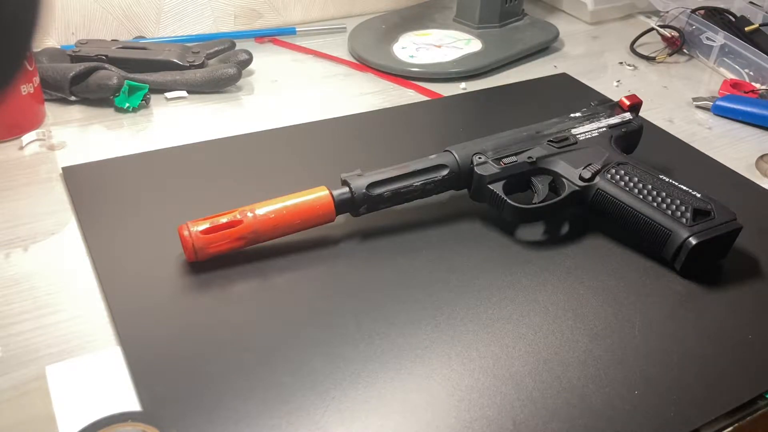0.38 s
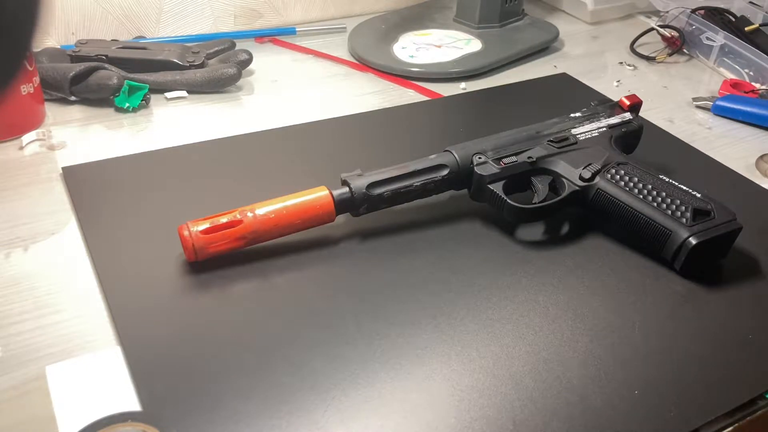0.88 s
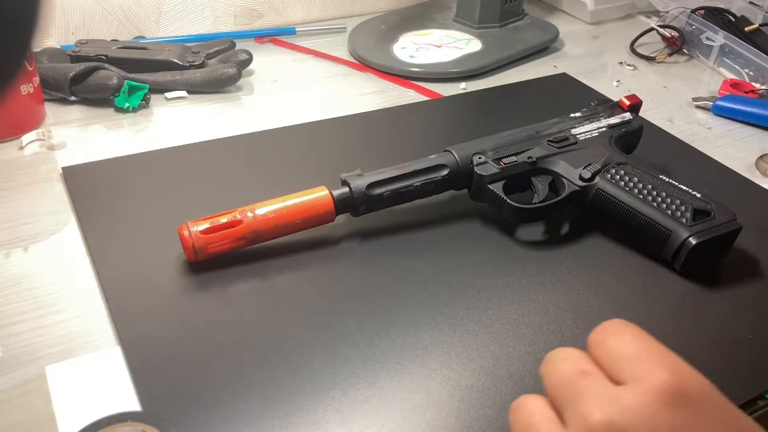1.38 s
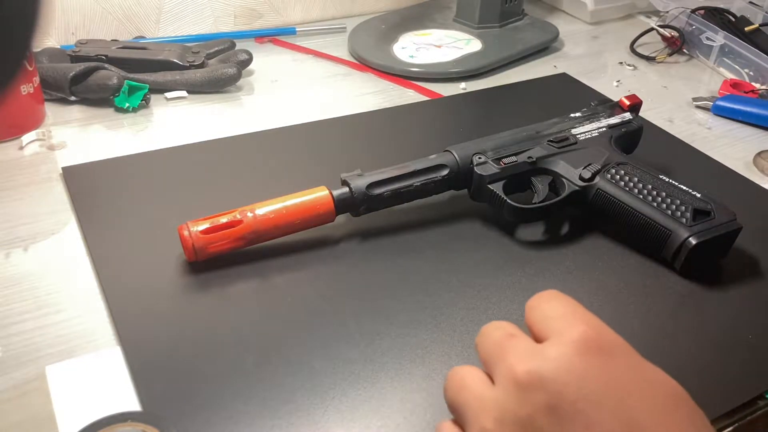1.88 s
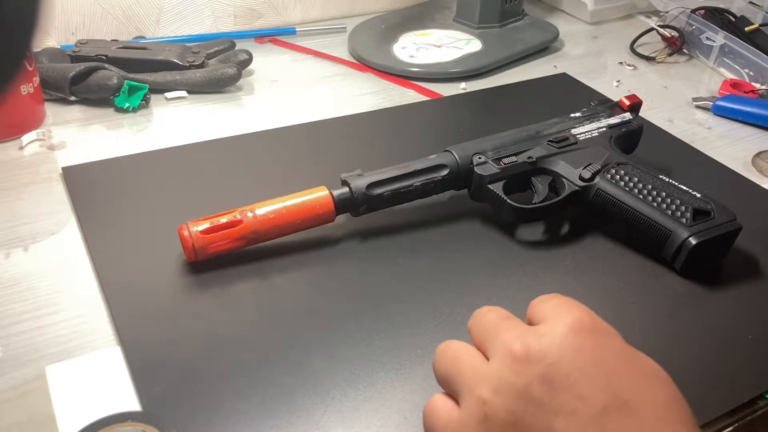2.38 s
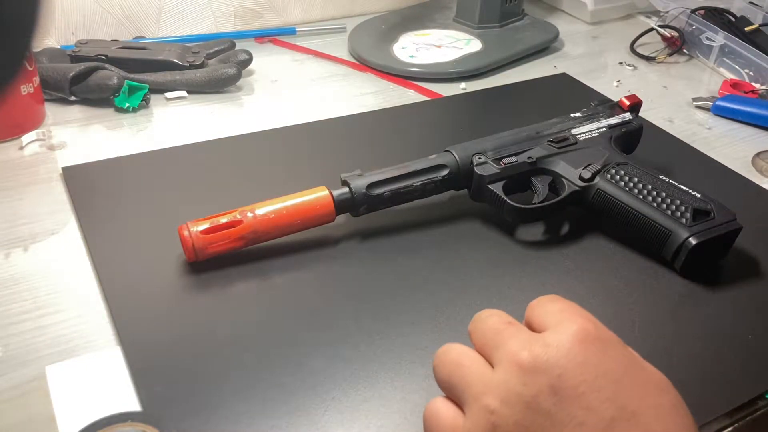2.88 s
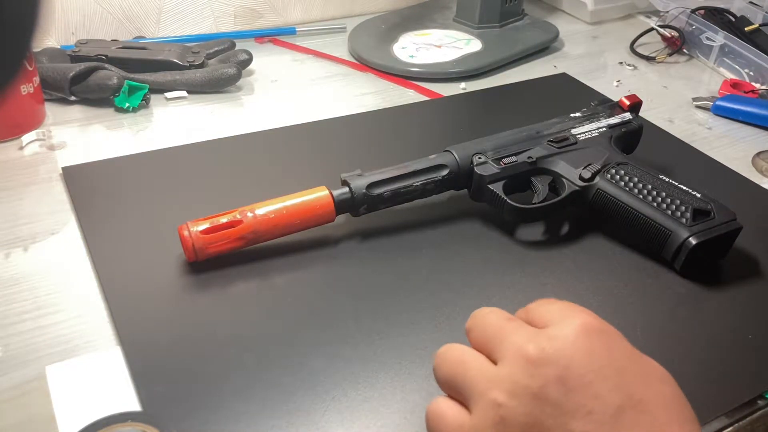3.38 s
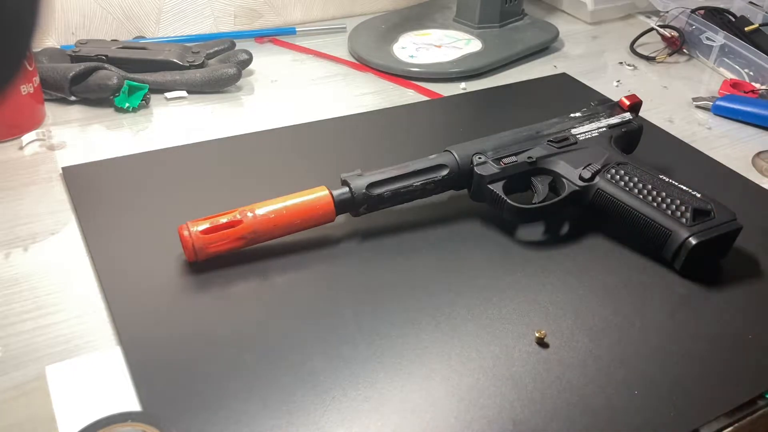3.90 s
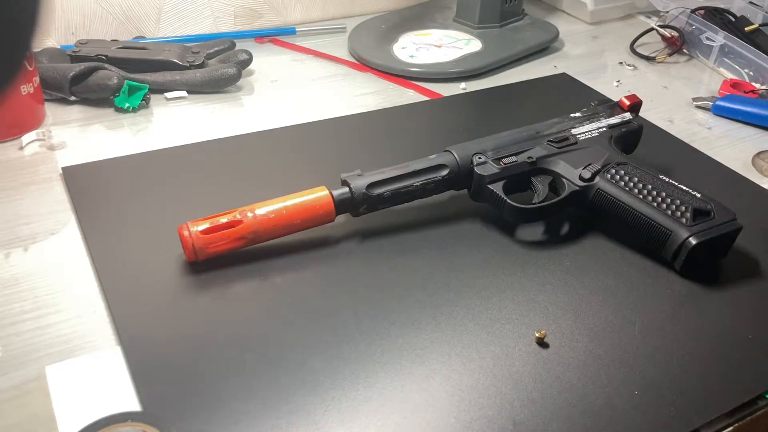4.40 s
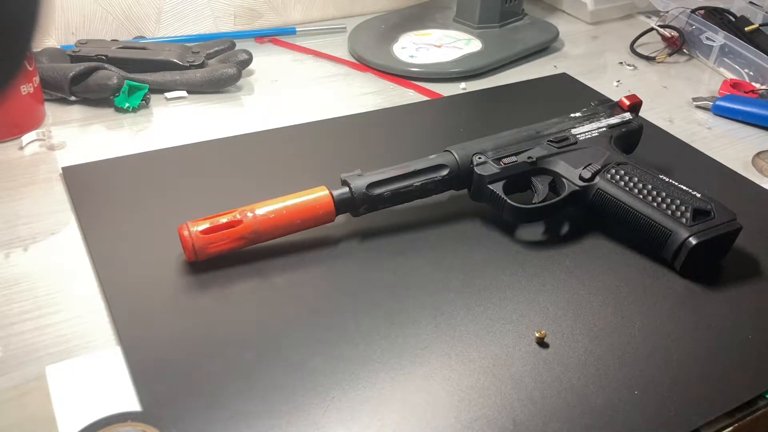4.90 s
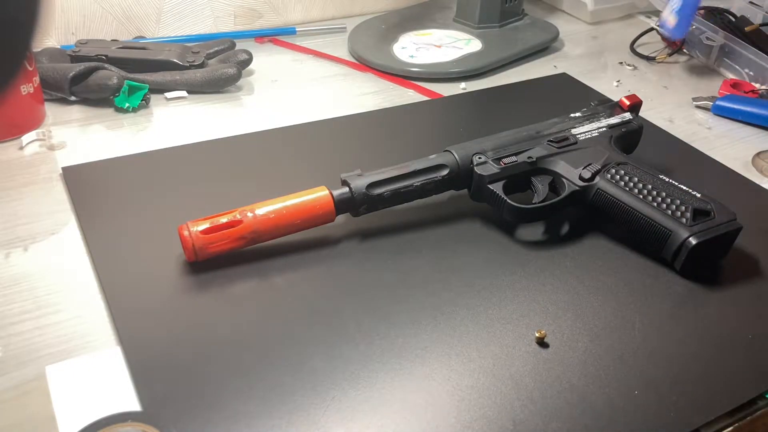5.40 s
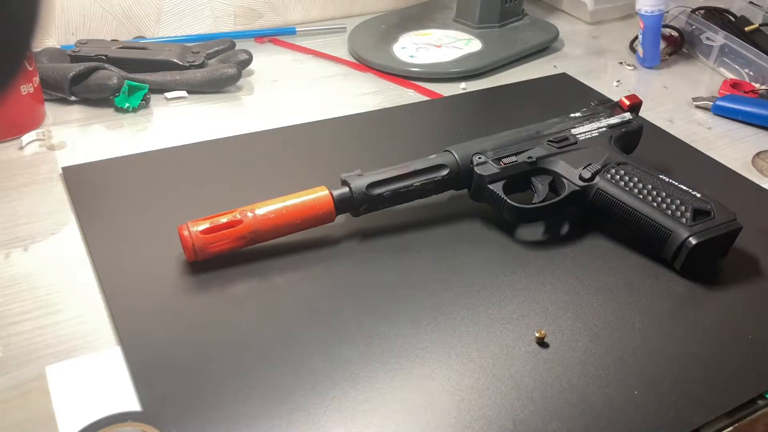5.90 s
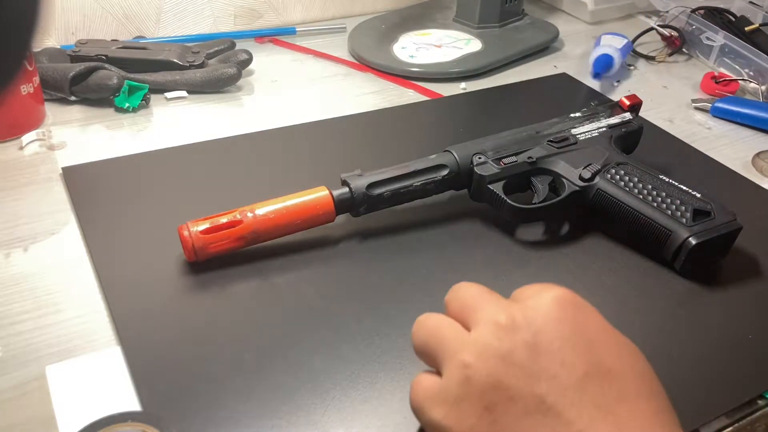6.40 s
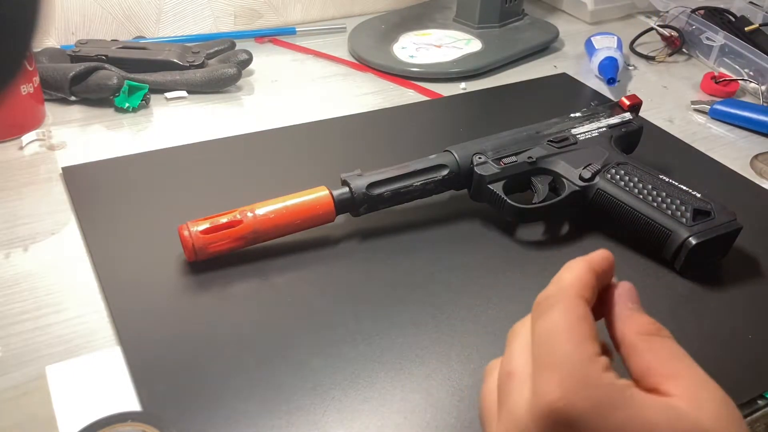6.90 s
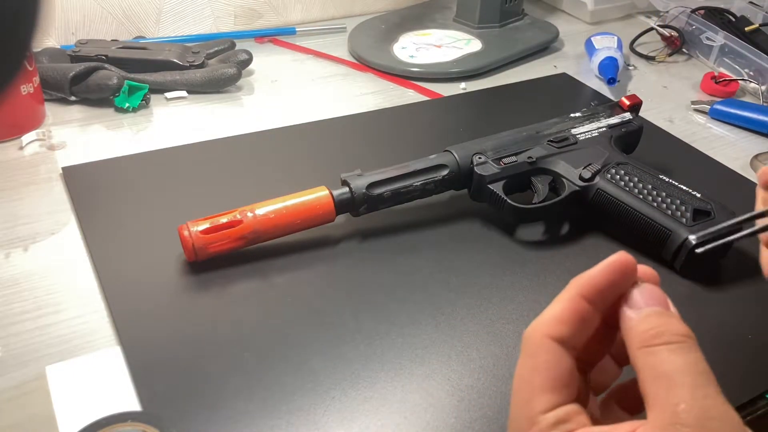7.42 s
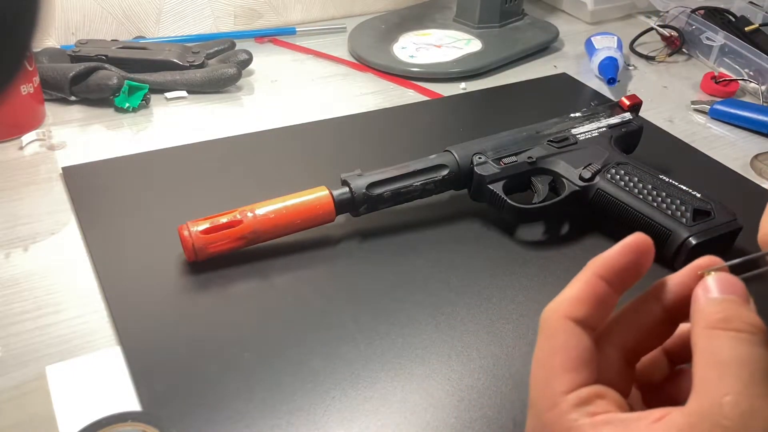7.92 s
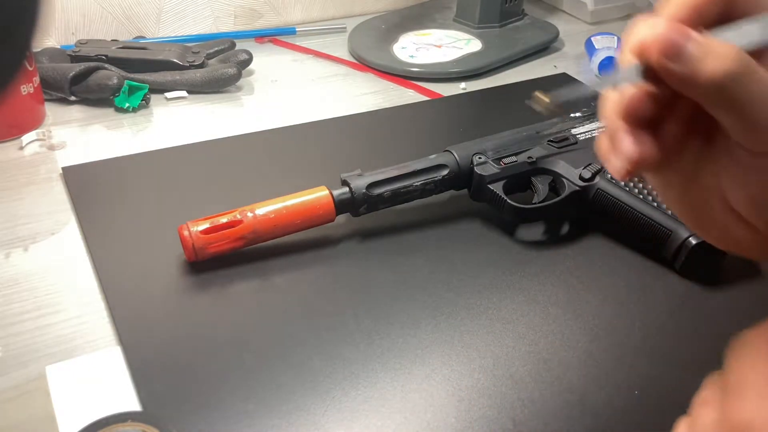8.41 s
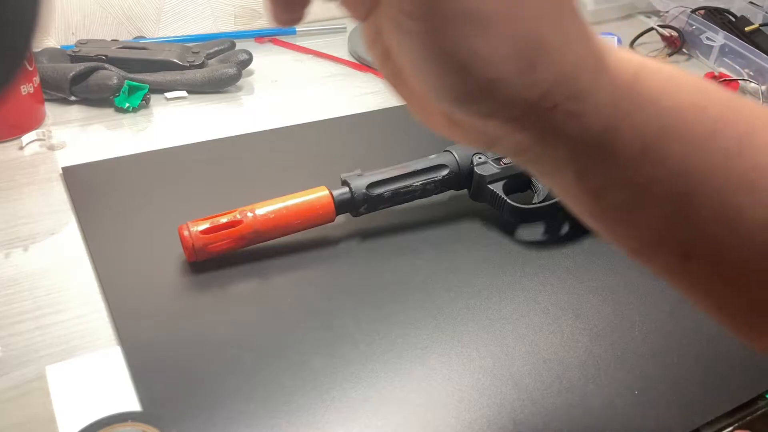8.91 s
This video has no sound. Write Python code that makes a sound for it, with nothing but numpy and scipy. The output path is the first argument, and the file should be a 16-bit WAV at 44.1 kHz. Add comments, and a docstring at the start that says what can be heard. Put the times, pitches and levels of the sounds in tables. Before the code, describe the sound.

A small hard part bounces to rest on a matted desk, followed by hand slaps, a sharp click and a plastic tube knocking over.

```python
"""Close to a phone in a quiet small room, distant traffic rumbles under microphone hiss: shaped noise.
Scuffs and taps of small metal parts on a matted desk come first, then a squeak (rough gliding tone) and,
at 1.5 s, a hard part bouncing to rest. From 2.9 s the hand lands on the mat in hollow slaps and dull thuds.
At 5.5 s a glue tube is set down hard; at 6.3 s it falls over and rocks; sparser handling follows.
Contacts are noise bursts ringing part and desk, plus room reflections; heavy blows swing the desk top."""
import sys
import numpy as np
from scipy import signal
from scipy.fft import rfft, irfft, next_fast_len
from scipy.io import wavfile
from scipy.ndimage import uniform_filter1d

SR = 44100
rng = np.random.default_rng(int(sys.argv[2]) if len(sys.argv) > 2 else 0)


def store_pcm(level_fs):
    """Save levels as 16-bit WAV."""
    pcm = np.round(np.clip(level_fs, -1, 1) * 32767).astype(np.int16)
    wavfile.write(sys.argv[1], SR, np.atleast_2d(pcm).T)


def invert_db(level):
    """Linear amplitude ratio for a level in decibels (20 dB per decade), elementwise."""
    return 10 ** (np.asarray(level, dtype=float) / 20)


N = 398663
SPAN = 16384  # samples per contact
HZ = np.fft.rfftfreq(SPAN, 1 / SR)
T_S = np.arange(SPAN) / SR

# background: (frequency [Hz], density [dB/Hz], left-right likeness [0-1])
QUIET = [(23.83, -94.5, 1), (54.06, -77, 1), (81.3, -88, 0.6), (130, -93, 1), (298, -100, 0.4),
         (546, -107, 0.1), (1030, -104, .05), (1810, -113, 0.4), (2300, -122, 1), (4770, -125, 0),
         (10590, -126, 0), (14700, -130, 0.6), (15000, -142, 0.55)]
# traffic swell, taken relative to its mean: (time [s], level [dB])
RUMBLE = [(0, -73), (1.3, -76), (2.099, -73.5), (3.002, -74.5), (4.099, -75), (4.699, -81.5), (4.801, -74),
          (5.899, -68.5), (6.801, -72), (7.102, -74), (7.7, -69.5), (7.78, -76.5), (9.04, -72.5)]
# bands of a contact, in the order click, thud, knock, snap, tick: (low edge [Hz], high edge [Hz])
BANDS_HZ = [(1800, 3200), (150, 600), (600, 1800), (3200, 6000), (6000, 16000)]
# room reflections in each of those bands: (t60 [s], level [dB], left-right likeness [0-1])
ROOM = [(0.19, -4.5, 0), (0.2, -0.5, 0.6), (0.2, -0.5, 0.3), (0.2, -2, 1), (0.21, -7.5, 0)]
# hands, right of the phone: (time [s], left minus right [dB], delay of the left port [samples])
HANDS = [(0, -7.5, 9.9), (1.5, -4.5, 12.3), (2.9, -4.5, 17.2), (4.5, -5.5, 19.6), (5.6, -1, 11),
         (6.3, -3.5, 16.1), (9.04, -1.5, 11)]
# resonances over the plain contact: (frequency [Hz], width [Hz], level [dB])
DESK_MODES = [(222, 37, -1), (286, 40, -2), (402, 34, 9), (475, 110, 3.5), (796, 80, 0.5), (904, 290, 9.5),
              (993, 190, 9.5), (1181, 100, 13), (1420, 68, 2.5), (1699, 62, 0)]
PART_MODES = [(2240, 400, 5.5), (3100, 130, 2), (4240, 300, 0.5), (8170, 2200, 5.5), (10917, 1500, 2.5)]
HOLLOW_MODES = [(525, 65, 15)]  # air under the cupped hand and the mat
BEAD_MODES = [(2570, 110, 11.5), (3700, 300, -13.5), (6300, 600, -15.5), (10900, 820, 11.5),
              (12270, 300, 16.5)]  # the bouncing part
TUBE_MODES = [(834, 40, 5), (1141, 35, 13.5), (1770, 60, 8.5), (2280, 300, 11), (3962, 200, 4),
              (8077, 970, 3)]
AROUND_DB = -7  # part resonances stand out less in the reflections
# contacts: (time [s], thud peak [dB], click peak [dB], tick peak [dB], chatter [ms], held to 0.3-40)
SCUFFS = [(0.002, -50, -64, -62.5, 13), (0.05, -54, -68, -74, 11.5), (0.321, -50.5, -67, -64.5, 21),
          (2.672, -51.5, -66, -69, 15.6), (2.789, -46.5, -57, -54, 17.6), (3.031, -46.5, -54.5, -53.5, 14),
          (3.356, -46.5, -60, -41, 3.3), (3.966, -46, -46, -52, 13.3), (3.988, -71, -55, -55, 50),
          (4.18, -72, -87, -57.5, 8.2), (4.81, -74, -83, -62, 34), (4.92, -85.5, -84, -60, 42),
          (5.09, -87, -76, -62, 15), (5.243, -56.5, -68.5, -76, 15.4), (5.68, -47, -55, -53.5, 16),
          (5.819, -49, -68, -70, 10), (5.91, -49.5, -76.5, -74, 5.5), (5.99, -45, -44.5, -48.5, 14.7),
          (6.03, -54, -50.5, -73, 15), (6.249, -43.5, -34, -44.5, 37), (6.513, -46.5, -45, -45, 12.2),
          (6.533, -56.5, -49, -44, 10.2), (6.6, -61, -56, -66, 17.2), (7.205, -55.5, -82.5, -75, 18.3),
          (7.578, -60, -72.5, -95, 19), (7.8, -75.5, -73, -59, 34), (8.894, -56, -77, -92, 20)]  # fingers and parts dragged a short way over the mat
TAPS = [(0.417, -53, -85, -87, 4.9), (1.322, -92, -50, -94, 8.6), (1.885, -57, -55.5, -56, 3.8),
        (1.948, -51.5, -55, -64, 1.94), (2.017, -55.5, -53, -69, 1.66), (2.108, -51, -49.5, -54.5, 5.1),
        (2.8, -45.5, -49, -81, 7.9), (2.853, -52, -56, -53, 3.3), (3.338, -57, -53, -30.5, 0.94),
        (3.412, -67, -28.5, -40.5, 2.65), (3.435, -75, -45, -61, 7.5), (3.884, -67, -61.5, -54, 2.5),
        (3.942, -81, -67, -49, 6.3), (4.024, -58, -40.5, -40, 2.3), (4.031, -76, -66, -41, 2.5),
        (4.072, -57, -82, -50, 3.7), (4.154, -47.5, -44.5, -50, 2.5), (4.47, -33.5, -34.5, -26.5, 1.72),
        (4.484, -37, -18, -12, 2.11), (5.977, -48.5, -46, -42.5, 2.5), (6.191, -58, -52.5, -62, 2.9),
        (6.867, -38, -49, -82, 1.1), (7.727, -76.5, -70, -52, 2.5), (7.769, -74, -65.5, -48, 3.5),
        (7.843, -86.5, -73.5, -51, 1.6), (7.865, -66.5, -73, -45.5, 1.6), (8.58, -81.5, -68, -54.5, 2.8),
        (8.726, -53, -49, -54, 0.69)]  # sharp taps and clicks
HAND_LANDINGS = [(2.922, -42, -42.5, -29, 23), (3.258, -39.5, -37.5, -27.5, 26.5),
                 (3.935, -43, -75, -59, 2.1), (4.098, -44.5, -51.5, -49, 2.8),
                 (4.4, -56.5, -82.5, -74.5, 3.1), (5.073, -51.5, -69, -50.5, 3.5),
                 (8.285, -55.5, -64.5, -62.5, 40), (8.988, -54.5, -86, -89, 26)]  # dull thuds and two long, bright, hollow slaps on the mat
TUBE_BLOWS = [(5.487, -45, -49.5, -48, 13), (5.5, -20.5, -22.5, -23.5, 4), (6.261, -21, -7, -5, 5),
              (6.277, -34, -36.5, -33, 2.8)]  # the glue tube is set down hard, then falls over
KNOCK_OF_CLICK_DB, SNAP_SHARE_OF_TICK = -8, .45  # knock hears desk and part; snap lies between click and tick
# stick-slip of part on part: (time [s], length [s], start [Hz], end [Hz], level [dB])
SQUEAKS = [(1.304, 0.056, 2075, 2099, -53.5), (3.335, 0.079, 2300, 2006, -42.5)]
DROP_S, FIRST_FLIGHT_S, RESTITUTION = 1.542, .084, .74  # each flight is this share of the one before
DROP_DB, BOUNCE_LOSS_DB = -22, -2.5  # first click; change per bounce
DULLING_DB = -0.5283  # treble change, times bounce number squared
# bouncing part's bands over its click: (thud [dB], knock [dB], snap [dB], tick [dB])
BOUNCE_COLOUR_DB = [-19, -7.5, -0.9, 6.5]
BOUNCE_MS, EDGE_LEAD_S, EDGE_DB, EDGE_MS = 1.56, 0.0036, -14.5, 4.2  # an edge touches before first landings
# lowest modes of the desk top: (frequency [Hz], level [dB], t60 [s])
DESK_TOP = [(138, -4, 0.2), (172, -8.5, .12), (211, -3.5, 0.09), (263, -8.5, 0.28), (311.7, -9.5, 0.2),
            (424, -14.5, 0.14)]
# heavy blows that shake the desk top: (time [s], drive [dB])
THUMPS = [(5.499, -22), (5.52, -24), (6.263, -20.5), (6.281, -40)]
# envelope of the fallen tube's jolts: (time [s], level [dB])
ROCKING = [(6.29, -59), (6.303, -30), (6.341, -35.5), (6.38, -35.5), (6.425, -42.5), (6.442, -40.5)]
SPLIT_HZ, TREBLE_LAG_SAMPLES = 5900, 13.66
BASS_CUT_HZ, TOP_HZ = 69, 15900


def background():
    """Room tone and microphone hiss from shaped noise; below 110 Hz the traffic swells and fades."""
    hz = np.fft.rfftfreq(N, 1 / SR)
    table_hz, table_db, table_like = np.transpose(QUIET)
    log_hz = np.log(np.maximum(hz, 1))
    like = np.interp(log_hz, np.log(table_hz), table_like)
    density = invert_db(np.interp(log_hz, np.log(table_hz), table_db, left=-140))
    mid, side = rfft(rng.standard_normal((2, N))) * density * np.sqrt(SR / 4)
    both = np.sqrt(1 + like) * mid + np.sqrt(1 - like) * side * np.array([[1], [-1]])
    low = 1 / (1 + (hz / 110) ** 6)
    s, swell_db = np.transpose(RUMBLE)
    swell = invert_db(np.interp(np.arange(N) / SR, s, swell_db - np.mean(swell_db)))
    return swell * irfft(both * low, N) + irfft(both * (1 - low), N)


def resonances(modes, offset_db=0):
    """Causal response of resonances standing over a flat contact sound."""
    response = 1
    for hz, width_hz, db in modes:
        damping = 1j * HZ * width_hz
        response = response + invert_db(db + offset_db) * damping / (hz ** 2 - HZ ** 2 + damping)
    return response


def band(edges_hz):
    """Causal band-pass response."""
    sos = signal.butter(3, edges_hz, "bandpass", fs=SR, output="sos")
    return signal.sosfreqz(sos, HZ, fs=SR)[1]


def add(out, sound, s):
    """Mix a sound in from time s."""
    k = int(s * SR)
    n = min(sound.shape[1], N - k)
    out[:, k:k + n] += sound[:, :n]


def echoes():
    """Spectrum of the reflections' power envelope per band: fast build-up, exponential decay."""
    spectra = []
    for t60_s, db, _ in ROOM:
        decay = np.exp(-2 * np.log(1000) * T_S / t60_s)
        power = (1 - np.exp(-T_S / 0.00047)) * decay * (T_S < .3)
        spectra.append(invert_db(2 * db) * rfft(power / power.sum()))
    return spectra


def to_ports(s):
    """Level and delay of the direct sound at both ports; the phone's body shades only short waves."""
    at_s, *place = np.transpose(HANDS)
    pan_db, lag_samples = (np.interp(s, at_s, column) for column in place)
    shadow = np.clip(HZ / 900, 0, 1)
    gain = invert_db(shadow * np.array([[pan_db], [-pan_db]]) / 2)
    return gain * np.exp(-2j * np.pi * HZ * np.array([[lag_samples], [0]]) / SR)


def contacts(events, modes, rise_share, bend, top_hz, first_db):
    """Micro-impact bursts ring part and desk; both ports hear them directly, then the room answers."""
    out, room = np.zeros((2, N)), echoes()
    mat_loss = 1 / (1 + (HZ / top_hz) ** 12)  # the soft mat takes the very top off
    bands = [band(edges_hz) * mat_loss for edges_hz in BANDS_HZ]
    near = resonances(DESK_MODES + modes)
    around = resonances(DESK_MODES) * resonances(modes, AROUND_DB)
    for s, *levels_db, chatter_ms in events:
        chance = rng.standard_normal((3, SPAN))
        chatter_s = np.clip(chatter_ms, .3, 40) / 1000
        rise = 1 - np.exp(-T_S / (rise_share * chatter_s))
        shape = rise * np.exp(-(T_S / chatter_s) ** bend) * (T_S < .06 + chatter_s)
        energy = np.sum(shape ** 2)
        # one clean impact at the burst's peak
        first = invert_db(first_db) * np.sqrt(energy) * np.exp(-2j * np.pi * HZ * T_S[shape.argmax()])
        burst = rfft(chance[0] * shape) + first
        direct = to_ports(s)
        total = 0
        for k, (body, db) in enumerate(zip(bands, levels_db)):
            rung = burst * near * body
            gain = body * invert_db(db) / np.abs(irfft(rung)).max()
            like = ROOM[k][2]
            walls = np.array([chance[1], like * chance[1] + np.sqrt(1 - like ** 2) * chance[2]])
            # dense reflections: noise whose power is the burst's power spread over the room's decay
            walls = walls * np.sqrt(np.abs(irfft(rfft(shape ** 2) * room[k])))
            walls = walls * np.linalg.norm(rung) / np.linalg.norm(near * body) / np.sqrt(energy)
            total = total + gain * (burst * near * direct + around * rfft(walls))
        add(out, irfft(total), s)
    return out


def five_bands(rows, knock_db, snap_db):
    """Derive knock and snap from thud, click and tick, as energy sum and weighted mean."""
    s, thud, click, tick, ms = np.transpose(rows)
    knock = 10 * np.log10(invert_db(2 * (thud + knock_db)) + invert_db(2 * (click + KNOCK_OF_CLICK_DB)))
    snap = click + SNAP_SHARE_OF_TICK * (tick - click) + snap_db
    return np.transpose([s, click, thud, knock, snap, tick, ms])


def scuffs():
    """Short drags: bursts with a long tail and a weak first impact, coloured by the hollow under hand and mat."""
    events = five_bands(SCUFFS, knock_db=1.56, snap_db=-4)
    return contacts(events, PART_MODES + HOLLOW_MODES, .09, 0.92, 15650, first_db=-18)


def taps():
    """Sharp taps and clicks: compact bursts with a clear first impact ring part and desk."""
    events = five_bands(TAPS, knock_db=1.8, snap_db=-8)
    return contacts(events, PART_MODES, 0.22, 2.4, 13000, first_db=-6.0)


def squeaks():
    """Quick stick-slip tones that glide, broken and rough."""
    out = np.zeros((2, N))
    for s, length_s, start_hz, end_hz, db in SQUEAKS:
        t = T_S[T_S < length_s]
        grip = uniform_filter1d(rng.standard_normal((2, SPAN))[:, :len(t)], size=90)
        rough = 0.49 + 3.5 * grip  # the grip breaks up
        wobble_hz = 1800 * uniform_filter1d(rng.standard_normal(SPAN)[:len(t)], size=70)
        cycles = np.cumsum(start_hz + (end_hz - start_hz) * t / length_s + wobble_hz) / SR
        swell = np.sin(np.pi * (t / length_s) ** 0.72) ** 0.99
        add(out, invert_db(db) * swell * rough * np.sin(2 * np.pi * cycles), s)
    return out


def bounces(count, edge_count):
    """Restitution brings landings ever closer, weaker and duller; an edge leads the first few."""
    k = np.arange(count)
    s = DROP_S + FIRST_FLIGHT_S * (1 - RESTITUTION ** k) / (1 - RESTITUTION)
    click = DROP_DB + BOUNCE_LOSS_DB * k
    thud, knock, snap, tick = click + np.array(BOUNCE_COLOUR_DB)[:, None]
    dulling = DULLING_DB * k ** 2
    landings = np.transpose([s, click, thud, knock, snap + dulling / 2, tick + dulling, BOUNCE_MS + 0 * s])
    edge_offset = [-EDGE_LEAD_S, EDGE_DB, 0, EDGE_DB / 2, EDGE_DB, EDGE_DB, EDGE_MS - BOUNCE_MS]
    return np.vstack([landings, landings[:edge_count] + edge_offset])


def bouncing_part():
    """A small hard part bounces to rest: each landing is a burst with a strong first impact."""
    return contacts(bounces(count=9, edge_count=2), BEAD_MODES, 0.16, 1.8, 12800, first_db=-1.0)


def hand_landings():
    """Dull thuds and two long, bright slaps on the mat: weak first impacts, coloured by the hollow's resonance."""
    events = five_bands(HAND_LANDINGS, knock_db=-11.5, snap_db=-6.5)
    return contacts(events, PART_MODES + HOLLOW_MODES, .12, 1.2, 16000, first_db=-16.5)


def tube_blows():
    """The glue tube strikes the desk: bursts ring the tube's own modes and the desk's."""
    events = five_bands(TUBE_BLOWS, knock_db=4, snap_db=-5.5)
    return contacts(events, TUBE_MODES, 0.32, 1.9, 16200, first_db=-6.5)


def desk_swing():
    """Decaying sines of the lowest desk-top modes."""
    t = T_S[:SR // 3]
    swing = 0
    for hz, db, t60_s in DESK_TOP:
        swing = swing + invert_db(db) * np.exp(-np.log(1000) * t / t60_s) * np.sin(2 * np.pi * hz * t)
    return t, swing


def thumps():
    """Soft pushes of some milliseconds swing the desk top, alike at both ports."""
    out = np.zeros((2, N))
    t, swing = desk_swing()
    push = (1 - np.exp(-t / 0.0073)) * swing
    for s, db in THUMPS:
        add(out, invert_db(db) * push * np.ones((2, 1)), s)
    return out


def rocking_tube():
    """Noise jolts of the rocking tube drive the desk-top modes until it lies still."""
    out = np.zeros((2, N))
    t, swing = desk_swing()
    s, db = np.transpose(ROCKING)
    jolts = rng.standard_normal((2, SPAN)) * invert_db(np.interp(T_S + s[0], s, db, right=-140))
    # the mat under the tube damps the swing, so it follows the jolts closely
    damped = swing * (1 - np.exp(-t / 0.00088)) * np.exp(-t / 0.024)
    damped = damped / np.sqrt(np.sum(damped ** 2))
    drive = jolts[:1] + 0.35 * jolts  # mostly common to both ports
    add(out, signal.fftconvolve(drive, damped[None], axes=1)[:, :SPAN], s[0])
    return out


def scene():
    """All contacts over the background."""
    handling = scuffs() + taps() + squeaks() + bouncing_part() + hand_landings()
    return background() + handling + tube_blows() + thumps() + rocking_tube()


def low_pass(x):
    """Removes everything above the highest recorded frequency."""
    return signal.sosfilt(signal.butter(12, 16810, fs=SR, output="sos"), x)


def record(dry):
    """Two ports up to the split; above it the left feeds both sides, right late and inverted; peaks rounded."""
    size = next_fast_len(N + 64)
    hz, both = np.fft.rfftfreq(size, 1 / SR), rfft(dry, size)
    high = 1 / (1 + (SPLIT_HZ / np.maximum(hz, 1)) ** 12)  # power share of the treble
    spread = np.array([np.ones(len(hz)), -np.exp(-2j * np.pi * hz * TREBLE_LAG_SAMPLES / SR)])
    mixed = both * np.sqrt(1 - high) + both[0] * np.sqrt(high) * spread
    mixed = mixed / (1 + (hz / TOP_HZ) ** 40)
    mixed = mixed * hz ** 2 / np.sqrt(hz ** 4 + BASS_CUT_HZ ** 4)
    loud = irfft(mixed, size)[:, :N]
    return low_pass(0.87 * np.tanh(loud / 0.84))


dry = scene()
out = record(dry)
store_pcm(out)
```